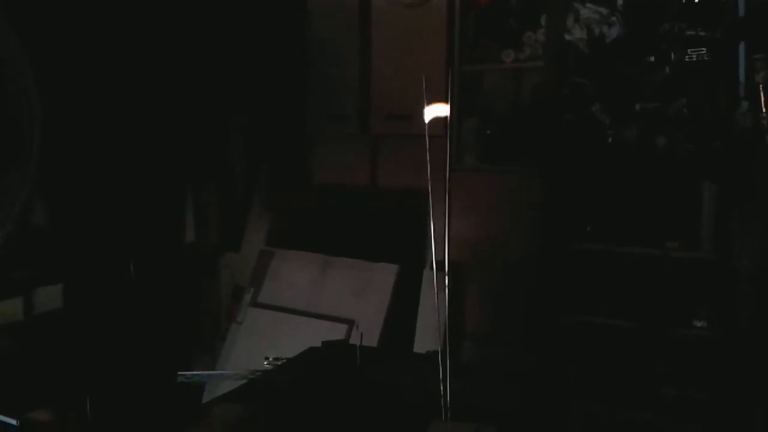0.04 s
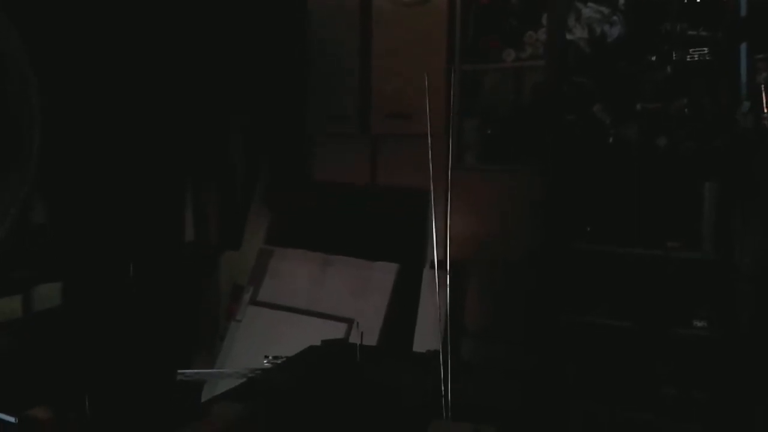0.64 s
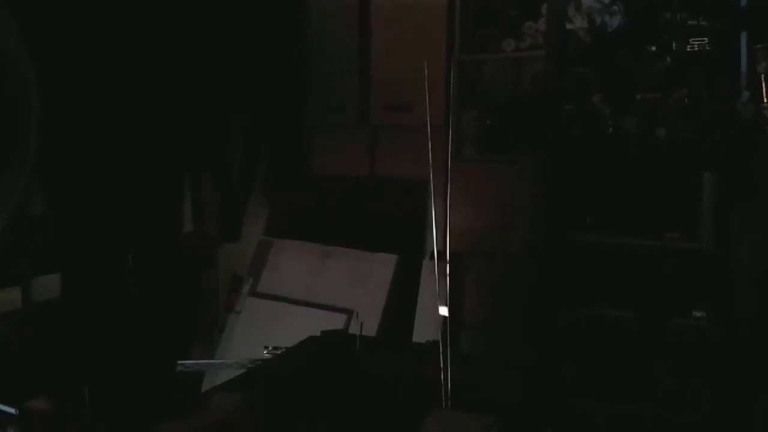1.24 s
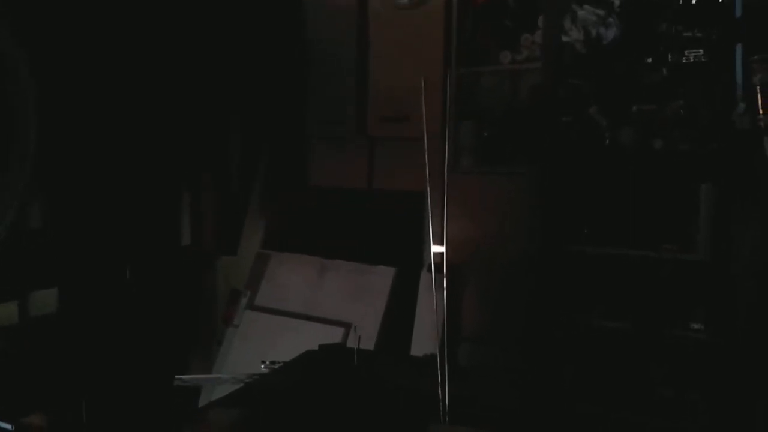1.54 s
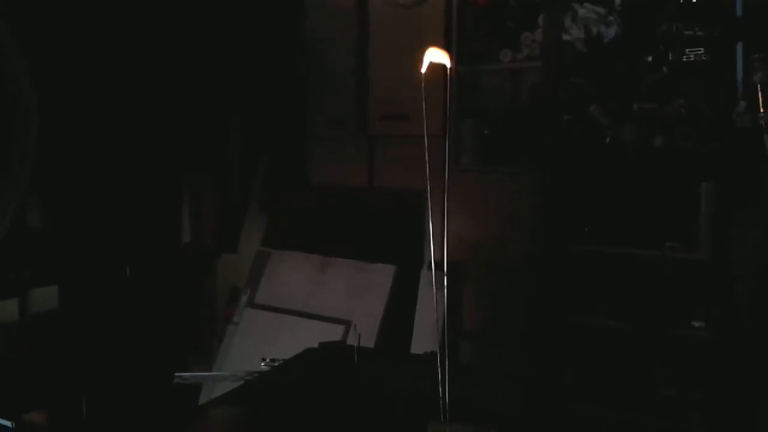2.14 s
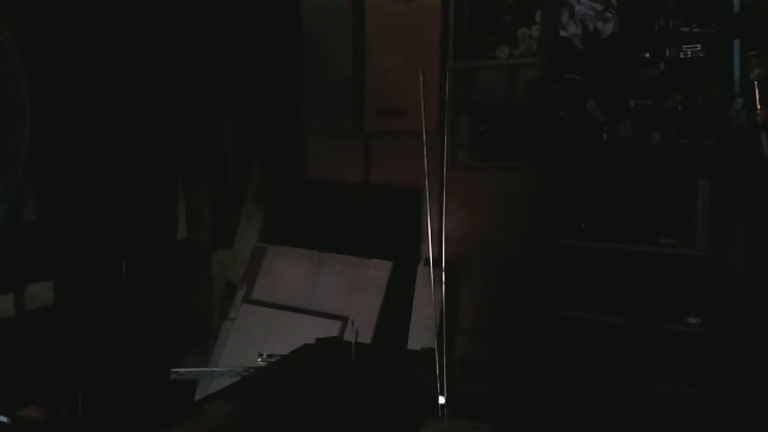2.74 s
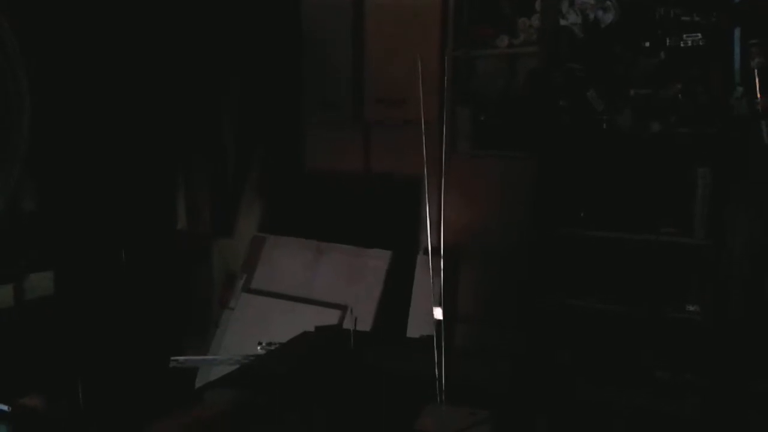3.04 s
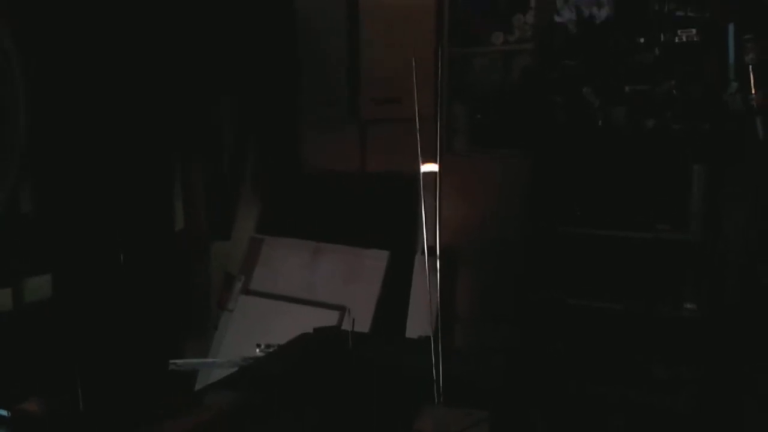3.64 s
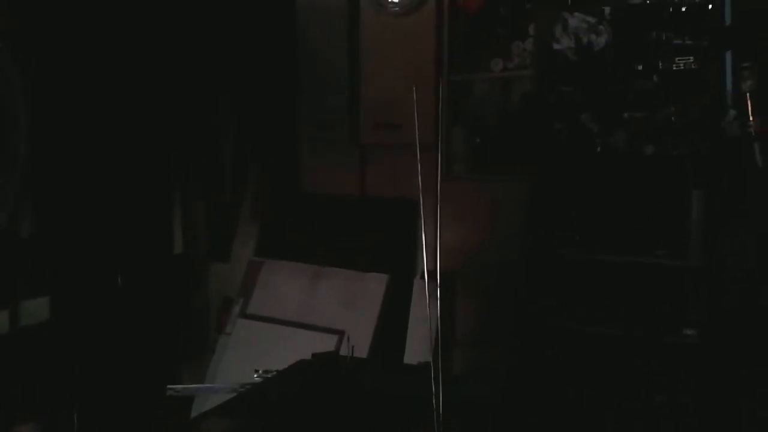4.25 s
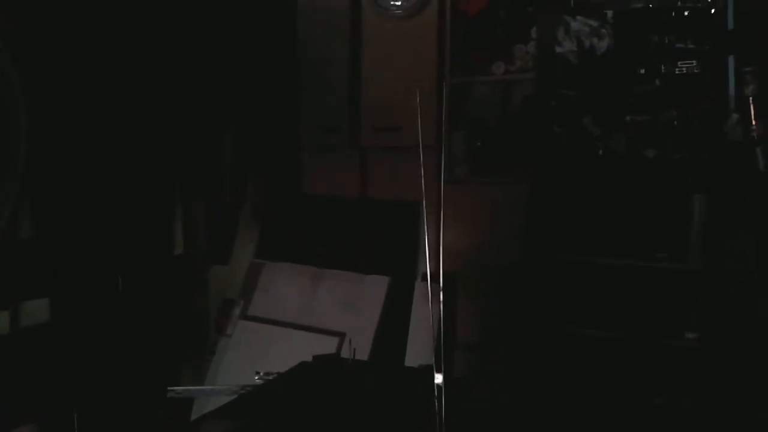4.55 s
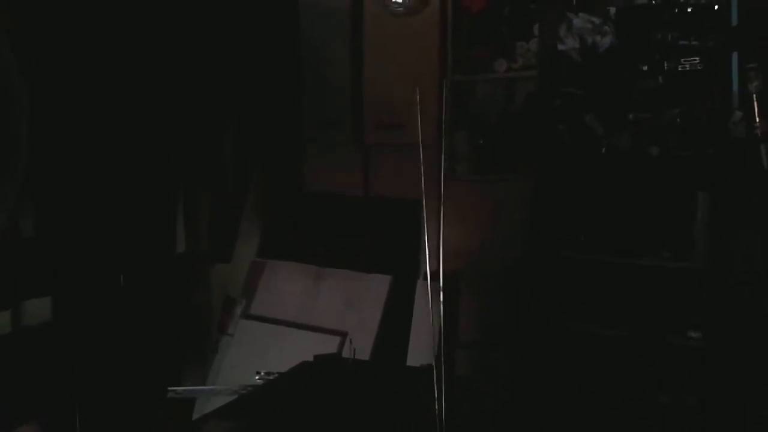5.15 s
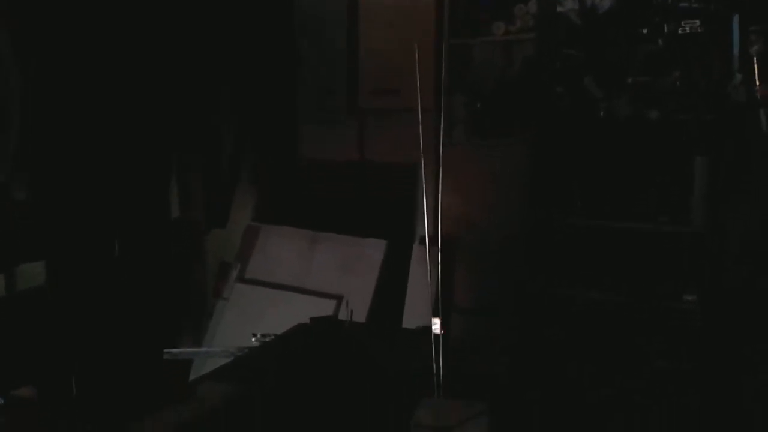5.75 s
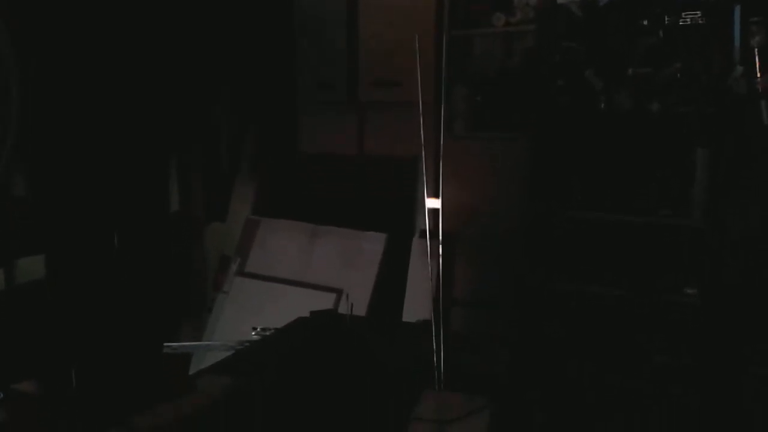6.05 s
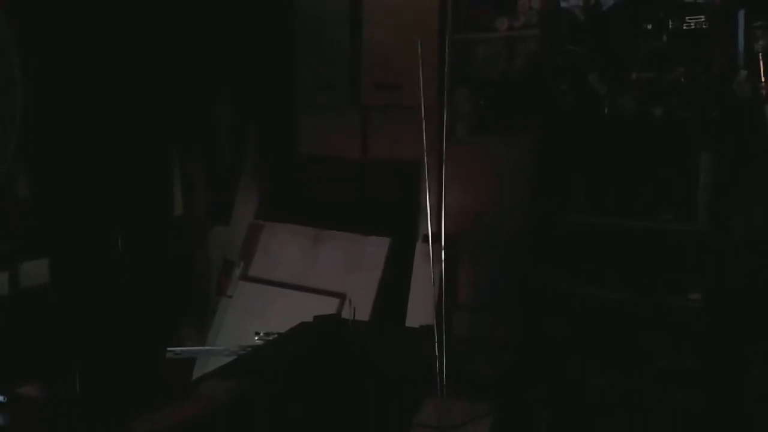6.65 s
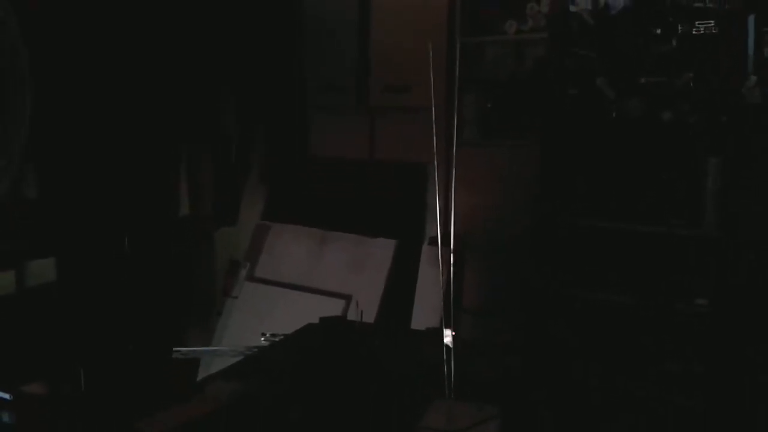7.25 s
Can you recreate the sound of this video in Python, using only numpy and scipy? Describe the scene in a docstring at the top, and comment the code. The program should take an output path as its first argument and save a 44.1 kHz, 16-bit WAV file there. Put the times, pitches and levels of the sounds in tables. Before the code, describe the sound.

A high-voltage arc climbs between two spreading wires in a small workshop. It starts as a thin sizzle, swells into a harsh, throbbing buzz, then tears off with sharp cracks and at once strikes again at the bottom. This repeats every one to two seconds, with stray snaps along the way. It sounds fairly close, with a short room echo, a faint transformer hum and soft hiss underneath.

```python
"""A harsh electric buzz swells and breaks off in loud cracks: a high-voltage arc tears off two spreading
wires in a small workshop. It strikes again at the foot and climbs, over and over. The arc relights on
every half cycle of the mains, so it is a train of sharp sparks: a thin sizzle while short, a harsh buzz
as it lengthens. Its hot air throbs, the room echoes, and the transformer hums underneath."""
import sys
import numpy as np
from scipy import signal
from scipy.fft import rfft, irfft, next_fast_len
from scipy.io import wavfile
from scipy.ndimage import uniform_filter1d

SR = 44100
rng = np.random.default_rng(int(sys.argv[2]) if len(sys.argv) > 2 else 0)


def int16_out(signal):
    """Quantize to a 16-bit WAV file."""
    q = np.round(np.clip(np.atleast_2d(signal).T, -1, 1) * 32767)
    wavfile.write(sys.argv[1], SR, q.astype(np.int16))


N = 330309
MAINS_HZ, TREBLE_LIMIT_HZ = 49.9855, 15850
SPARK_HZ = 2 * MAINS_HZ
FIRE_S = 0.00245  # how far into its half cycle the shortest arc fires

# Tone of the steady room noise: f/Hz, relative level/dB
NOISE_COLOUR = [(20, -27), (40, -10), (55, 0.5), (85, -5.5), (150, -0.5), (280, 1.5), (500, -1),
                (900, -0.5), (1500, -6), (3500, -11), (8000, -7.5), (16000, -10)]
# Tones of the transformer: multiple of the spark rate, rms level/dB
HUM_TONES = [(1, -84), (2, -71), (3, -77), (4, -68), (5, -78.5), (7, -74), (8, -72.5), (10, -74), (11, -82),
             (12, -74), (15, -80), (20, -74), (21, -74)]
# The room's lingering sound: f/Hz, time to fade by 60 dB/s, relative level/dB
REVERB_BANDS = [(150, 0.26, 3), (704, 0.28, -1.5), (1990, 0.19, 0.3), (3600, 0.16, 2.6), (5000, 0.16, -0.7),
                (6000, 0.16, -1), (7300, 0.19, 4.3), (8500, 0.19, -0.5), (9500, 0.19, -3.8),
                (10800, 0.19, -0.8), (12300, 0.2, 1), (14600, 0.22, 1)]
# Echoes off nearby surfaces: delay at the foot/s, change in delay per second of climbing/s, level/dB
NEAR_ECHOES = [(.0005, .0003, -15), (.0013, .0007, -15), (.0018, .0009, -16.5), (.0056, -.0014, -19)]
# Resonances of the microphone opening, each delaying its own band of a spark: f/Hz, width/Hz
PORT_RESONANCES = [(5200, 3400), (9200, 2950), (14200, 2700)]
# Ringing of the microphone housing: f/Hz, width/Hz, level/dB
HOUSING_RINGS = [(2080, 600, -18), (5300, 1300, -13), (9200, 1500, -12.5), (14150, 900, -14)]
# Bands that cancel in the direct sound: f/Hz, width/Hz, depth (0-1) at the foot, depth at the top
CANCELLED_BANDS = [(1200, 450, 0.35, 0.55), (3500, 900, 0.55, 0.5), (6950, 650, 0.5, 0.1),
                   (10050, 550, 0.03, 0.65), (12500, 900, 0.03, 0.5)]
# One climb a row. Arc length is 0 at the foot, 3 at the top and over 3 when overstretched.
# Strike t/s, tear-off t/s, first length, length it heads for, rise time/s, how it clings to the foot
# (a power), level offset/dB, last stretch in length, last level change/dB
ARC_CLIMBS = [(-1.5, 0.318, 0, 2.95, 0.8, 1.7, 1.3, 1.4, -7),
              (0.38, 2.218, 0.15, 3.08, 0.9, 1.9, 0.0, 0.6, -8),
              (2.26, 4.128, 0.15, 3.0, 0.87, 1.7, -0.5, 0.1, -4),
              (4.17, 4.908, 0.8, 3.0, 0.73, 2.0, -0.1, 0.2, 0),
              (4.97, 6.229, 0.3, 2.66, 0.89, 3.6, -0.2, 0.0, 0),
              (6.31, 7.6, 0.05, 3.0, 1.01, 3.8, -0.5, 0, 0)]
# A long arc bows out and grows louder: t/s, gain/dB, half width/s
ARC_SURGES = [(0.0, 4.2, 0.03), (0.13, 7.2, 0.06), (1.4, 1.2, 0.07), (1.515, 2.8, 0.045),
              (1.855, 6.3, 0.055), (2.09, 3.4, 0.06), (3.15, 1, 0.15), (3.44, 2.3, 0.08), (5.98, 1.3, 0.07),
              (6.24, 5.5, 0.04), (7.49, 1.5, 0.06)]
# Tones of the hot air swelling each half cycle: multiple of the spark rate, relative level/dB
THROB_TONES = [(1, -10), (2, 1.5), (3, 0.5), (4, -8), (5, -8), (6, 2), (7, -5), (8, -12), (9, -9),
               (11, -16), (12, -14), (13, -12)]
# The five arc lengths at which SPARK_SPECTRA gives a spark's tone
COLOUR_LENGTHS = [0.1, 1.45, 2.2, 2.55, 2.95]
# A longer spark is a wider, duller pulse: f/Hz, then relative level/dB at each of COLOUR_LENGTHS
SPARK_SPECTRA = [(300, -32, -29, -29, -28, -25), (750, -23, -22, -23, -21.5, -17.5),
                 (1150, -21, -22, -22, -21, -14), (1500, -23.5, -23, -21.5, -15.5, -8),
                 (2100, -19.5, -13.5, -15.5, -10.5, -4), (2700, -21, -16.5, -17.5, -12.5, -5.5),
                 (3600, -21.5, -19.5, -18, -10, -6), (4200, -21, -18.5, -16, -9, -6),
                 (4700, -15.5, -12.5, -9.3, -3.5, -2.3), (6100, -15, -12.5, -8.5, -5.5, -3),
                 (7400, -13, -10, -5, -2.5, -1), (8500, -11, -3.5, 0.8, -0.5, -1),
                 (9500, -5, -2, -1, -1.5, -1.5), (10100, -6, -5, -6.5, -6.5, -6.5),
                 (11200, -11, -6.5, -11.5, -6.5, -6), (12900, -7.5, -7, -17, -7, -6),
                 (13900, -3.5, -3.5, -0.5, -0.5, -0.5), (15500, -2.5, -6, -3.5, -4.5, -5)]
# The arc snaps as it jumps up the wires and cracks when overstretched: t/s, level/dB, arc length
ARC_CRACKS = [(0.3216, -22.5, 3.9), (0.3317, -33, 3.5), (0.3416, -20.3, 3.9), (0.3514, -30, 3.3),
              (.3611, -20.5, 3.25), (1.2226, -33.2, 2.1), (1.4826, -30.3, 2.3), (1.6926, -30.5, 2.5),
              (1.9424, -27, 2.4), (2.2223, -33.5, 3.35), (3.4331, -29.8, 2.1), (4.1328, -33, 3.2),
              (4.1418, -33, 3.5), (4.7235, -34.6, 1.5), (4.7635, -33.6, 1.7), (4.8935, -35, 2.2),
              (4.9034, -34, 2.3), (4.9133, -28.5, 2.4), (4.9232, -28.5, 2.55), (4.9332, -25, 2.55),
              (4.943, -26, 2.45), (5.354, -35.8, .5), (6.2138, -29.5, 2.5), (6.2338, -26, 2.6),
              (6.2436, -27, 2.45), (6.2536, -23, 2.6), (6.2634, -25, 2.45), (6.2733, -23, 2.65),
              (6.2831, -23.5, 2.6), (7.2045, -35, 1.2)]
# The long arc flares and collapses, and a new one strikes at the foot:
# t/s, collapse level/dB, strike level/dB, flare strength, flare half width/s
ARC_RESTRIKES = [(0.3707, -28, -25, 1.0, 0.03), (2.2412, -20.5, -27, 1.1, 0.022),
                 (4.152, -29.5, -23.8, 0.5, 0.025), (4.953, -23.5, -23, 0.9, 0.018),
                 (6.2932, -31, -24.5, 1.1, 0.028)]


def amp(db):
    """Turn decibels into a gain."""
    return 10 ** (np.asarray(db) / 20)


def unit_rms(x):
    """Scale a signal to an average power of 1."""
    return x / np.sqrt(np.mean(x ** 2) + 1e-20)


def lookup(table, hz, column=1):
    """Read one column of a frequency table, blending smoothly between its rows."""
    table = np.array(table, float)
    return np.interp(np.log(hz + 1), np.log(np.sort(table[:, 0]) + 1), table[:, column])


def wander(rate_hz, size=2048):
    """A slow random drift, about 1 in size."""
    hz = np.fft.rfftfreq(size, N / SR / size)
    slow = unit_rms(irfft(rfft(rng.standard_normal(size)) * np.exp(-(hz / rate_hz) ** 2)))
    return np.interp(np.linspace(0, size - 1, N), np.arange(size), slow)


def room_noise(level_db=-53.5, sway_db=-0.4):
    """The soft, steady hiss and rumble of the room."""
    size = next_fast_len(N, True)
    colour = amp(lookup(NOISE_COLOUR, np.fft.rfftfreq(size, 1 / SR)))
    noise = irfft(rfft(rng.standard_normal(size)) * colour, size)[:N]
    return unit_rms(noise) * amp(level_db + sway_db * wander(1.7))


def transformer_hum(waver=0.18):
    """The transformer core hums on multiples of twice the mains frequency."""
    cycles = SPARK_HZ * (np.arange(N) / SR - FIRE_S)
    hum = np.zeros(N)
    for multiple, db in HUM_TONES:
        stagger = (round(multiple) - 2) ** 2 / 16  # tones out of step sound smooth, with no pulse
        tone = np.cos(2 * np.pi * (round(multiple) * cycles + stagger))
        hum += amp(db) * (1 + waver * wander(1.5)) * tone
    return np.sqrt(2) * hum


def climb_at(t):
    """The columns of the climb that is under way at each time."""
    rows = np.array(ARC_CLIMBS)
    return rows[np.searchsorted(rows[:, 0], t) - 1].T


def climb_age(t):
    """Seconds since the arc struck; hot air rises steadily, so this stands for its height."""
    return t - climb_at(t)[0]


def surge_db(t):
    """Extra level while the arc bows out."""
    return sum(db * np.exp(-((t - at) / width) ** 2) for at, db, width in ARC_SURGES)


def flare(t):
    """How strongly the flame flares just before a restrike, 0 to about 1."""
    return sum(size * np.exp(-((t - at + width) / width) ** 2) for at, _, _, size, width in ARC_RESTRIKES)


def arc_state(t, foot_db=-40.5, growth_db=5.75, starve_s=0.035, bow_per_db=0.035):
    """Length and level of the arc: it leaves the foot slowly, grows, then starves at the top."""
    strike, tear, foot, top, rise_s, cling, climb_db, stretch, sag_db = climb_at(t)
    length = foot + (top - foot) * (1 - np.exp(-((t - strike) / rise_s) ** cling))
    level_db = foot_db + climb_db + growth_db * (np.maximum(length, 0) / 3) ** 2
    starving = np.exp(np.minimum(t - tear, 0) / starve_s)
    surge = surge_db(t)
    return length + stretch * starving + bow_per_db * surge, level_db + sag_db * starving + surge


def hot_length():
    """Length of the hot air at every sample, smoothed because it takes a moment to cool."""
    t = np.arange(0, N / SR, .002)
    length = np.clip(arc_state(t)[0], 0, 3)
    return np.interp(np.arange(N) / SR, t, uniform_filter1d(length, size=30))


def firing_delay(length, lead_s=0.00062):
    """Seconds from the start of a half cycle to its spark: a long arc fires earlier."""
    return FIRE_S - lead_s * (np.clip(length, 0, 3) / 3) ** 2


def room_reverb(x, wet_db=-3.4, db_per_length=0.75, first_echo_s=0.0012, heights=9):
    """Dense reflections off clutter and walls; their pattern changes as the arc rises."""
    place = climb_age(np.arange(N) / SR)
    place = place / place.max() * (heights - 1)
    x = x * amp(wet_db + db_per_length * hot_length())
    t, reverb = np.arange(SR // 3) / SR, np.zeros(N)
    for height in range(heights):
        echoes = rng.standard_normal(len(t)) * (rng.random(len(t)) < .2) * (t > first_echo_s)
        hz, age, bands = signal.stft(echoes, SR, nperseg=128)
        fade = amp(-60 * age / lookup(REVERB_BANDS, hz)[:, None])
        tail = signal.istft(bands * fade, SR, nperseg=128)[1]
        # even out the tail, then give each band its own level
        power = uniform_filter1d(abs(rfft(tail)) ** 2, size=90)
        colour = amp(lookup(REVERB_BANDS, np.fft.rfftfreq(len(tail), 1 / SR), column=2))
        tail = irfft(rfft(tail) / np.sqrt(power) * colour)
        nearness = np.sqrt(np.maximum(1 - abs(place - height), 0))
        reverb += signal.oaconvolve(x * nearness, tail)[:N]
    return reverb


def resonate(x, hz, width_hz):
    """Keep one narrow, ringing band of a sound."""
    return signal.lfilter(*signal.iirpeak(hz, hz / width_hz, fs=SR), x)


def housing_ring(x):
    """The microphone housing rings briefly, giving each spark its bite."""
    return sum(amp(db) * resonate(x, hz, width) for hz, width, db in HOUSING_RINGS)


def direct_path(x):
    """Narrow bands cancel in the direct sound, more so in the high treble as the arc grows."""
    grown = hot_length() / 3
    for hz, width, foot, top in CANCELLED_BANDS:
        depth = np.clip(foot + (top - foot) * grown, 0, 1)
        x = x - depth * resonate(x, hz, width)
    return x


def low_thud(start_s=4.953, gain_db=-36.5, decay_s=0.0023):
    """A dull, low push sounds briefly at 4.95 s."""
    decays = np.maximum(np.arange(N) / SR - start_s, 0) / decay_s
    return amp(gain_db) * np.exp(-decays) * (1 - np.exp(-10 * decays))


def flame_rasp(gain_db=-49.5, band_hz=(220, 950), puff_cycles=0.3):
    """The tearing flame gives a rough, low puff with every half cycle."""
    t = np.arange(N) / SR
    cycles = SPARK_HZ * (t - firing_delay(hot_length()))
    puffs = np.exp(-(cycles % 1) / puff_cycles) * rng.standard_normal(N)
    puffs = signal.sosfilt(signal.butter(2, band_hz, "band", fs=SR, output="sos"), puffs)
    return unit_rms(puffs) * amp(gain_db) * flare(t)


def air_throb(base_db=-58, short_db=-7.3, duller_db=-1.5, flare_db=5.5, waver=0.13, rough=0.26):
    """Hot air swells with each spark and makes a low buzz, weak and dull while the arc is short."""
    t, length = np.arange(N) / SR, hot_length()
    cycles = SPARK_HZ * (t - firing_delay(length))
    flaring = flare(t)
    shortness = (3 - length) * np.maximum(1 - flaring, 0)
    buzz = np.zeros(N)
    for multiple, db in THROB_TONES:
        filled_db = db * (1 - 0.5 * flaring)  # a flare fills in the weak tones
        tilt_db = duller_db * np.log2(multiple / 2) * shortness
        flutter = 1 + waver * wander(3) + rough * wander(35)
        buzz += amp(filled_db + tilt_db) * flutter * np.cos(2 * np.pi * round(multiple) * cycles)
    return buzz * amp(base_db + short_db * shortness + flare_db * flaring + 0.45 * surge_db(t))


def spark_colour(hz, length, ridge_foot_hz=11500, ridge_top_hz=4900, ridge_db=3, ragged_db=1.3):
    """Each spark's gain at each frequency, set by the length and crooked path of the arc."""
    overstretch, length = np.maximum(length - 3, 0), np.clip(length, 0, 3)
    colour_db = sum(np.interp(length, COLOUR_LENGTHS, share) * lookup(SPARK_SPECTRA, hz, column=k + 1)
                    for k, share in enumerate(np.eye(len(COLOUR_LENGTHS))))
    # a boosted band of the sizzle slides down as the arc lengthens
    ridge_hz = ridge_foot_hz * (ridge_top_hz / ridge_foot_hz) ** (length / 3)
    colour_db += ridge_db * np.exp(-(np.log2((hz + 1) / ridge_hz) / 0.22) ** 2)
    # an overstretched spark is so wide that mostly the lowest port resonance rings
    kept_band = np.exp(-(np.log2((hz + 1) / PORT_RESONANCES[0][0]) / 0.5) ** 2)
    colour_db -= 12 * overstretch * (1 - kept_band)
    crooked = unit_rms(uniform_filter1d(rng.standard_normal(colour_db.shape), size=24, axis=1))
    return amp(colour_db + ragged_db * crooked) / np.sqrt(1 + (hz / TREBLE_LIMIT_HZ) ** 40)


def spark_train(times, level_db, length, spread=0.9, spread_s=.00033, low_cut_hz=210, size=512):
    """Each spark sends out one short pressure pulse, followed by echoes off nearby surfaces."""
    hz = np.fft.rfftfreq(size, 1 / SR)
    length = np.broadcast_to(length, times.shape)[:, None]
    gain = spark_colour(hz, length)
    # this phase puts the pulse's energy at its start, for a sharp attack
    log_gain = np.log(np.hstack([gain, gain[:, -2:0:-1]]))
    spectra = gain * np.exp(-1j * signal.hilbert(log_gain).imag[:, :len(hz)])
    for centre_hz, width_hz in PORT_RESONANCES:
        spectra *= np.exp(-2j * np.arctan2(hz * width_hz, centre_hz ** 2 - hz ** 2))
    # sound from the ends of a long arc arrives before and after sound from its middle
    grown = np.clip(length, 0, 3) / 3
    spectra *= np.exp(1j * spread * grown * np.sin(2 * np.pi * hz * spread_s))
    spectra /= np.linalg.norm(irfft(spectra), axis=1)[:, None]
    spectra *= amp(level_db)[:, None] * np.sqrt(SR / SPARK_HZ)
    # the echo paths change as the arc rises, so ripples sweep through the sizzle
    age = climb_age(times)[:, None]
    spectra *= 1 + sum(amp(db) * np.exp(-2j * np.pi * hz * (delay + change * age))
                       for delay, change, db in NEAR_ECHOES)
    starts = times * SR - 52
    lead_in = starts % 1 + 40  # samples of room for the early sound
    pulses = irfft(spectra * np.exp(-2j * np.pi * hz / SR * lead_in[:, None]))
    train = np.zeros(N)
    for start, pulse in zip(starts.astype(int), pulses):
        part = train[max(start, 0):][:size]
        part += pulse[:len(part)]
    return signal.sosfilt(signal.butter(2, low_cut_hz, "high", fs=SR, output="sos"), train)


def restrikes(long_length=3.05, foot_length=0.5, delays_s=(.00012, .00053)):
    """The long arc collapses, and almost at once the gap at the foot fires twice."""
    times, collapse_db, strike_db, _, _ = np.transpose(ARC_RESTRIKES)
    strikes = sum(spark_train(times + delay, strike_db, foot_length) for delay in delays_s)
    return spark_train(times, collapse_db, long_length) + strikes


def cracks():
    """Single loud sparks as the arc jumps up the wires or is overstretched."""
    times, level_db, length = np.transpose(ARC_CRACKS)
    return spark_train(times, level_db, length)


def arc_buzz(flutter_db=0.55, sway_db=0.3, polarity_db=-0.6, polarity_s=18e-6, jitter_s=15e-6):
    """A spark every half cycle; the two current directions differ a little, and a long arc is uneven."""
    count = np.arange(N * SPARK_HZ // SR)
    t = count / SPARK_HZ
    length, level_db = arc_state(t)
    louder, later = rng.standard_normal((len(t), 2)).T
    polarity = (-1.) ** count
    sway = wander(8)[(t * SR).astype(int)]
    level_db += flutter_db * louder + sway_db * sway + polarity_db * polarity
    # a crack takes the place of the ordinary spark of its half cycle
    cracked = np.isin(count, (np.array(ARC_CRACKS)[:, 0] * SPARK_HZ).astype(int))
    burning = (t <= climb_at(t)[1]) & ~cracked
    times = t + firing_delay(length) + polarity_s * polarity + jitter_s * (1 + length) * later
    return spark_train(times[burning], level_db[burning], length[burning], spread=1.05)


def scene(sudden_reverb_db=-1):
    """The sparks, heard directly and off the walls, over the low sounds and the room noise."""
    steady = arc_buzz()
    sudden = cracks() + restrikes()
    sparks = steady + sudden
    mix = direct_path(sparks + housing_ring(sparks))
    mix += room_reverb(steady + amp(sudden_reverb_db) * sudden)
    mix += air_throb() + flame_rasp() + transformer_hum() + room_noise() + low_thud()
    return mix[None]


def limiter(x, threshold_db=-20, share=0.45, recover_db_per_s=45):
    """The gain drops by a share of a loud crack's excess level and soon comes back."""
    power = signal.lfilter([1 / 300], [1, 1 / 300 - 1], x[0] ** 2)  # averaged over 300 samples
    fall_db = recover_db_per_s * np.arange(N) / SR
    held_db = np.maximum.accumulate(10 * np.log10(power + 1e-12) + fall_db) - fall_db
    over_db = np.maximum(held_db - threshold_db, 0)
    smooth_db = signal.lfilter([1 / 400], [1, 1 / 400 - 1], over_db)
    return x / amp(share * smooth_db)


def record(dry, ceiling=.6):
    """The loudest cracks duck the gain and overload the microphone; the highest treble is cut."""
    doubled_rate = signal.resample_poly(limiter(dry), 2, 1, axis=1)
    rounded = doubled_rate / (1 + (doubled_rate / ceiling) ** 6) ** (1 / 6)
    overloaded = signal.resample_poly(rounded, 1, 2, axis=1)
    low_pass = signal.firwin(401, TREBLE_LIMIT_HZ, window=("kaiser", 8), fs=SR)
    return signal.oaconvolve(overloaded, low_pass[None], "same")


dry = scene()
out = record(dry)
int16_out(out)
```